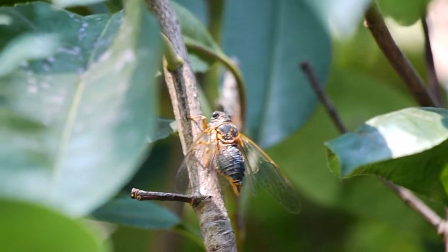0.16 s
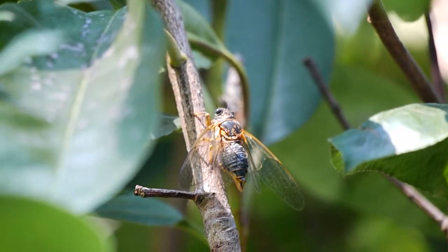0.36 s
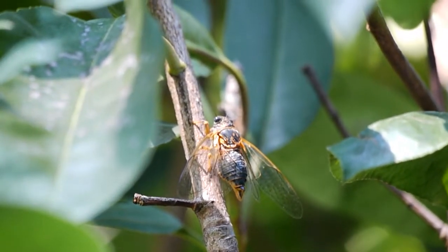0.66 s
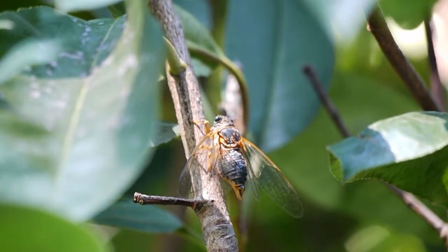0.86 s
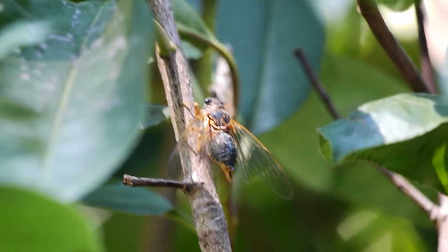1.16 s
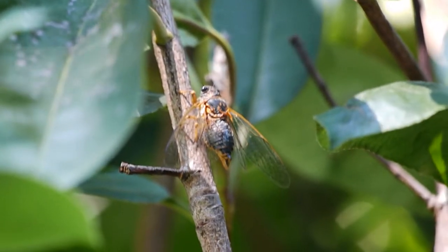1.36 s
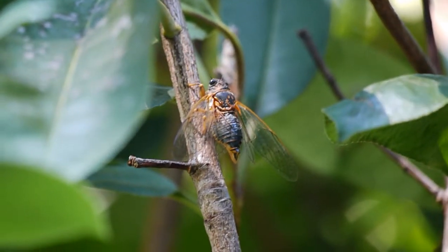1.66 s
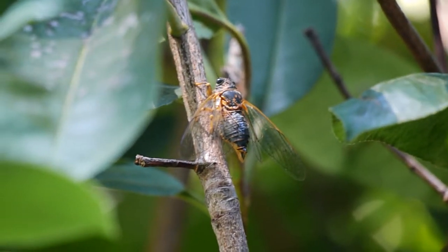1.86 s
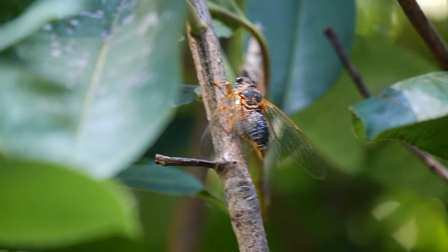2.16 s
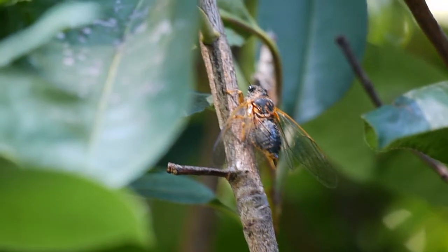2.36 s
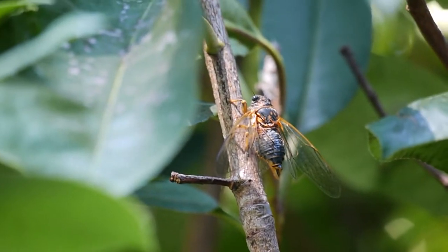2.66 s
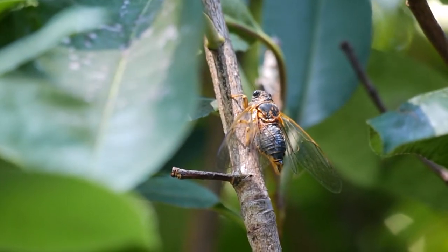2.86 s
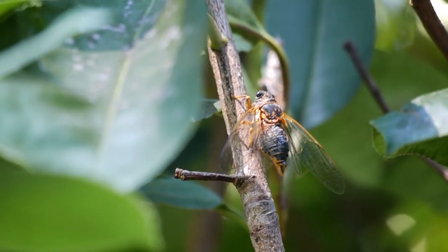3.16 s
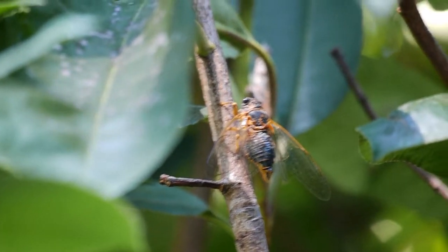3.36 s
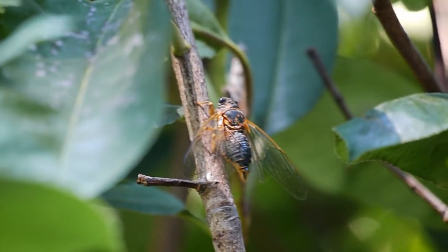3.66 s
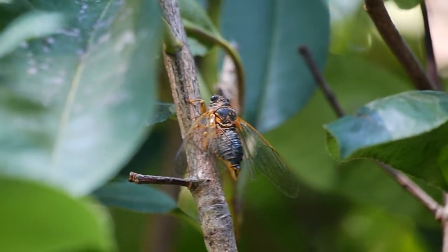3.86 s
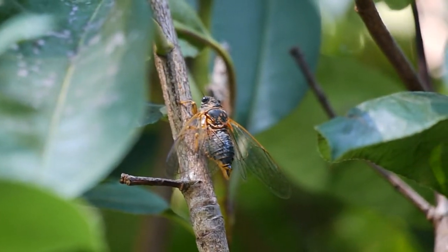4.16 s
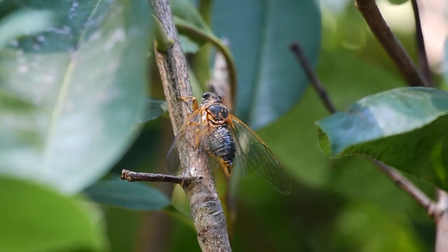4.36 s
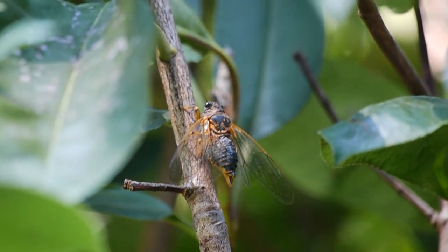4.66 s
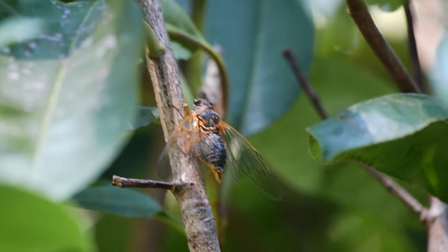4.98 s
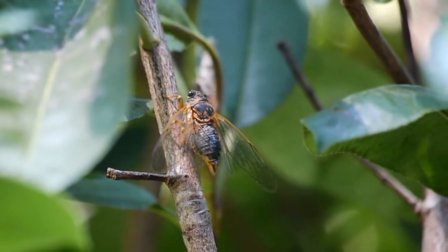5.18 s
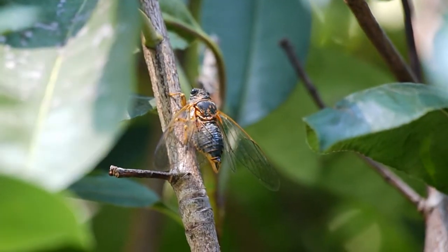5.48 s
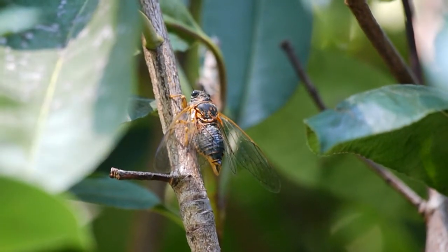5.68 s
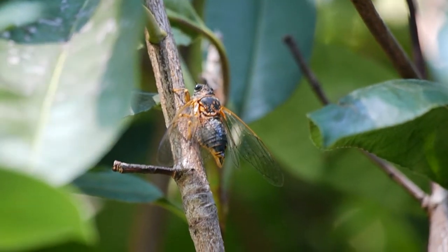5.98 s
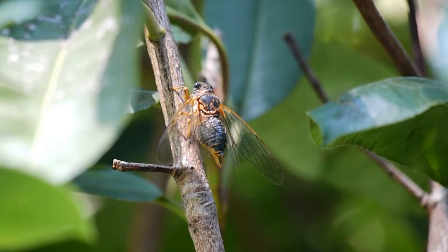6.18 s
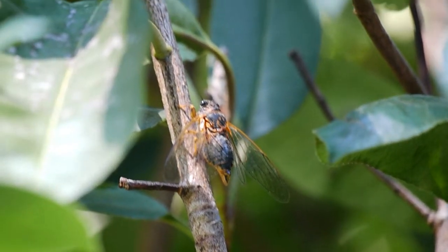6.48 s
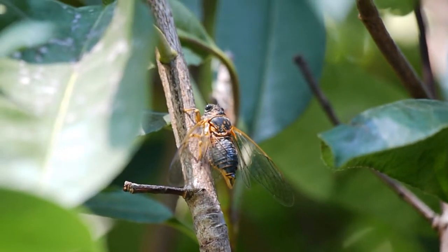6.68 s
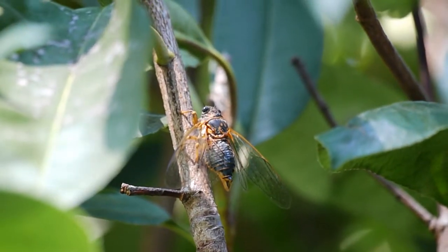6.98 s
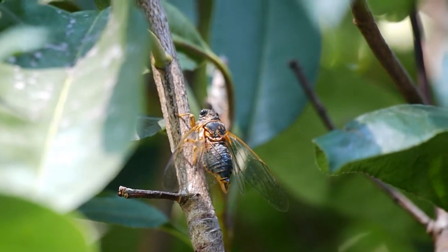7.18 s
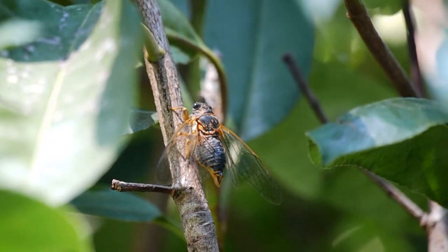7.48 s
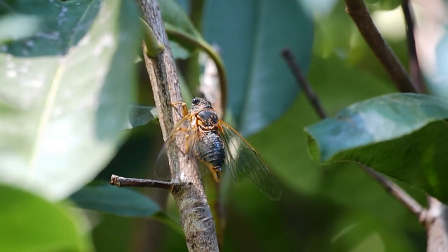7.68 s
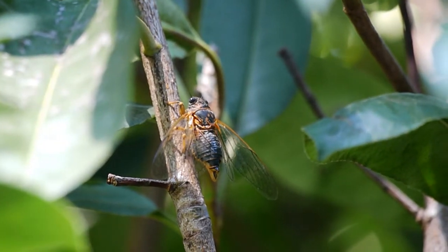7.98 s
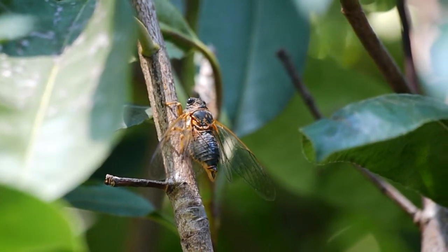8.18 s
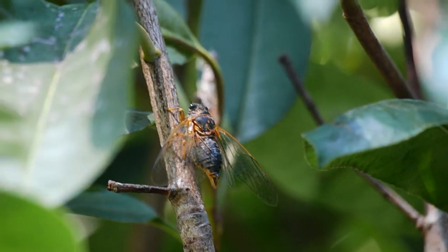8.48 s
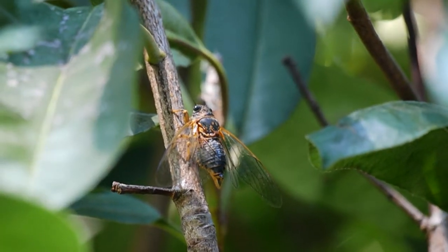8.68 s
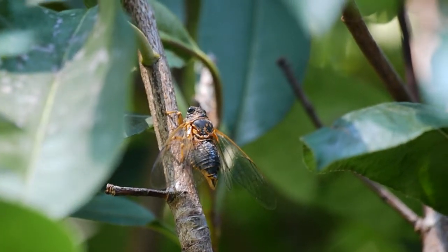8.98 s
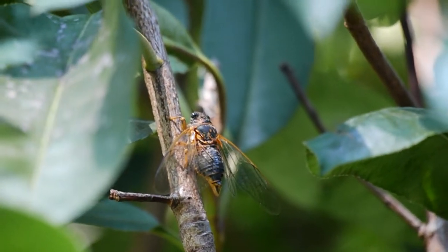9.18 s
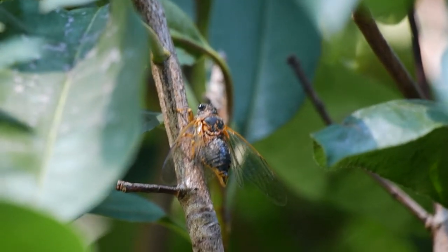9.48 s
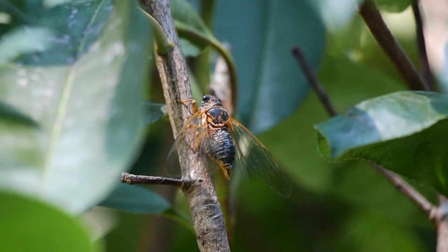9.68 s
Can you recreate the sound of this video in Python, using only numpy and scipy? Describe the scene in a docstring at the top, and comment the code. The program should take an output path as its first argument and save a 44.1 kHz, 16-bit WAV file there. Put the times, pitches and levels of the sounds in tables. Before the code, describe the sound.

One cicada on a twig sings an unbroken, piercing high buzz at close range, slowly softening and roughening over a faint distant town rumble.

```python
"""Leafy shrubs, a distant town: a cicada on a twig sings one unbroken buzz, close to two microphones.
Its two tymbals buckle in turn, rib after rib; the clicks ring its membranes and hollow abdomen.
The tone shifts with its posture; it slowly softens and roughens. Leaves echo the bare clicks.
Behind are shaped noise for the town and vehicles, narrow noise bands for far insects, a fan's
wavering sine tones and one decaying noise tick from a twig."""
import sys
import numpy as np
from scipy import signal
from scipy.fft import rfft, irfft, next_fast_len
from scipy.io import wavfile
from scipy.ndimage import map_coordinates

SR = 44100
rng = np.random.default_rng(int(sys.argv[2]) if len(sys.argv) > 2 else 0)


def to_wav(s):
    """Save 16-bit WAV."""
    ch = np.atleast_2d(s).T  # columns
    pcm = np.round(np.clip(ch, -1, 1) * 32767)  # PCM
    wavfile.write(sys.argv[1], SR, pcm.astype(np.int16))


N = 433944
TIME_S = np.arange(N) / SR

# The cicada's posture, which picks or blends the level columns of BODY_MODES: start_s, posture (0-2)
POSTURE_PATH = [(0, 0), (1.6, 0), (2.15, .4), (2.3, 1.4), (3.8, .85), (4.7, 1.3), (9.84, 2)]
# The ribs of a tymbal, buckling one after another in each contraction: delay_ms, click_db (relative)
TYMBAL_RIBS = [(0, 5), (1.151, -9), (1.998, -2.5), (2.751, -5), (3.599, 8), (5.3, 0.5)]
# Resonances of membranes and abdomen, levels relative to each other:
# pitch_hz, posture_0_db, posture_1_db, posture_2_db
BODY_MODES = [(7648, -54, -55, -56), (8225, -49, -51, -51), (8514, -42, -45, -47), (8947, -47, -44, -42),
              (9091, -41, -37, -37), (9235, -39, -40, -39), (9524, -37, -36, -43), (9668, -41, -48, -42),
              (9957, -38, -32, -34), (10101, -40, -35, -36), (10245, -27, -29, -31), (10390, -31, -37, -36),
              (10534, -43, -43, -40), (10678, -38, -35, -36), (11111, -40, -39, -42),
              (11255, -40, -39, -39), (11833, -50, -48, -43), (12410, -56, -51, -54),
              (12698, -54, -59, -57)]
# Colour of a bare click: pitch_hz, level_db (relative)
CLICK_COLOUR = [(3000, -50), (6700, -28), (7500, -13), (8400, -9), (9200, -2), (9750, -5), (10290, 3),
                (10580, -14), (10800, -4), (11300, -3), (11580, -14), (12700, -15), (13400, -22),
                (14600, -30)]
# Noise colours of the town wash, thin hiss and passing vehicles: pitch_hz, level_db (relative, per Hz)
WASH_COLOUR = [(12, -30), (22, -17), (45, -0.5), (85, -4.5), (125, -1.5), (300, -3.5), (560, -5),
               (880, -3.5), (1250, -6), (1700, -11), (2400, -17), (3300, -20.5), (4600, -23.5),
               (9000, -26.5)]
HISS_COLOUR = [(2500, -22), (5000, -21.5), (9000, 30), (15000, -11)]
TRAFFIC_COLOUR = [(70, -23), (150, -4.5), (280, 0), (420, -5), (700, -20), (1500, -50)]
# Motor and blade tones of the fan unit: pitch_hz, level_db (rms, before the fan's trim and flutter)
FAN_TONES = [(59.2, -53), (114.4, -55.5), (232.8, -54), (294.7, -58.5), (411.8, -55.5), (471.0, -58),
             (530.3, -59), (588.1, -61), (1162.8, -60.5), (1999.9, -66.5)]
# Small twig ticks: start_s, onset_db (rms of the noise as the decay begins)
TWIG_TICKS = [(.768, -36)]
# Distant insect bands: pitch_hz, width_hz (of each resonator), level_db (rms, before wavering)
INSECT_BANDS = [(2780, 230, -62), (5400, 95, -66), (6340, 110, -66.5)]
# Moments when the cicada fidgets and its buzz rasps: peak_s, strength (0-1)
RASPS = [(2.26, 0.9), (4.18, .35), (5.88, .3), (9.35, 0.2)]
# Distant vehicles passing: nearest_s, level_db, half_length_s
VEHICLE_PASSES = [(2.4, -50, .3), (3.9, -45.5, .25), (6.3, -44, 0.73), (7.7, -45.5, 1), (9.0, -45.5, 0.38)]

# The muscles tire: contractions per second when fresh and settled, time constant of settling (s)
FRESH_HZ, SETTLED_HZ, SETTLE_S = 144.85, 144.08, 2.4
# Song level at first (dB rms) and its fade
SONG_DB, FADE_DB_PER_S = -22.5, 0.3275
# Click timing scatter at first (microseconds) and its growth
SCATTER_US, SCATTER_US_PER_S = 10.2, 0.31
# Bare clicks relative to the ringing body at first (dB), and their growth
BARE_DB, BARE_DB_PER_S = -9.5, 0.45
# Half-length of a fidget (s); what one of strength 1 adds to scatter (microseconds) and bare clicks (dB)
FIDGET_S, FIDGET_US, FIDGET_DB = 0.063, 9, 7
# The throb deepens, then evens out: greatest depth (0-1), its time (s), half-length (s)
THROB_DEPTH, THROB_AT_S, THROB_S = 0.58, 2.8, 5.6
# Upper edge of all the sound (Hz)
TOP_HZ = 15150


def amp(db):
    """Decibels to gain."""
    return 10 ** (np.asarray(db) / 20)


def unit(x):
    """Scaled to rms 1."""
    return x / np.sqrt(np.mean(x ** 2) + 1e-20)


def along(points, hz):
    """Read a curve of (Hz, value) points on a log frequency axis."""
    point_hz, values = np.transpose(points)
    return np.interp(np.log(hz + 1), np.log(point_hz + 1), values)


def wobble(rate):
    """A smooth random curve with rate knots a second."""
    knots = rng.standard_normal(int(N * rate / SR) + 4)
    return map_coordinates(knots, [np.arange(N) * rate / SR])


def hump(at_s, half_s):
    """A smooth bell that peaks at 1, and falls to 1/e at half_s either side."""
    return np.exp(-((TIME_S - at_s) / half_s) ** 2)


def filtered(x, response):
    """Shape x by a response given as a function of frequency."""
    size = next_fast_len(N + 8192)
    spectrum = rfft(x, size) * response(np.fft.rfftfreq(size, 1 / SR))
    return irfft(spectrum, size)[..., :N]


def noise(colour):
    """Coloured noise of rms 1."""
    return unit(filtered(rng.standard_normal(N), lambda hz: amp(along(colour, hz))))


def resonate(x, hz, width_hz):
    """A steep-sided resonance: two equal resonators in a row."""
    b, a = signal.iirpeak(hz, hz / width_hz, SR)
    once = signal.lfilter(b, a, x)
    return signal.lfilter(b, a, once)


def pulses(at, sizes, order=8):
    """Impulses between samples: each is a short windowed sinc around its exact position."""
    index = np.floor(at).astype(int)[:, None] + np.arange(1 - order, order + 1)
    offset = index - at[:, None]
    shape = np.sinc(offset) * np.cos(np.pi * offset / (2 * order)) ** 2
    weights = sizes[:, None] * shape * (index >= 0)
    # everything past the end lands in one spare sample, which is dropped
    return np.bincount(np.clip(index, 0, N).ravel(), weights.ravel(), N + 1)[:N]


def contractions(waver=0.000702):
    """The running count of tymbal contractions: the rate sags, settles and wavers slightly."""
    rate_hz = SETTLED_HZ + (FRESH_HZ - SETTLED_HZ) * np.exp(-TIME_S / SETTLE_S)
    return np.cumsum(rate_hz * (1 + waver * wobble(16))) / SR


def rib_clicks(cycles, scatter_us, looseness=1.85, lag_us=7, size_db=1.0, slip_us=3):
    """Each rib's firm train, to ring the body; and the bare clicks of all ribs, more loosely timed."""
    starts = np.interp(np.arange(int(cycles[-1])), cycles, np.arange(N))
    scatter = scatter_us[starts.astype(int)]
    # one tymbal fires slightly behind the beat, adding weak lines halfway between the harmonics
    lag = lag_us * (np.arange(len(starts)) % 2)
    slip = lag + slip_us * rng.standard_normal(len(starts))
    firm, loose = [], []
    for delay_ms, click_db in TYMBAL_RIBS:
        jitter, strength, crumple = rng.standard_normal((3, len(starts)))
        at = starts + SR * (delay_ms / 1e3 + (slip + scatter * jitter) / 1e6)
        sizes = amp(click_db + size_db * strength)
        loose_at = at + SR * looseness * scatter * crumple / 1e6
        firm.append(pulses(at, sizes))
        loose.append(pulses(loose_at, sizes))
    return firm, sum(loose)


def body(ribs, width_hz=130, count=3):
    """The first three ribs each ring their own share of the resonances; posture sets the balance."""
    posture = np.interp(TIME_S, *np.transpose(POSTURE_PATH))
    ring, power = np.zeros(N), np.zeros(N)
    for k, (hz, *posture_db) in enumerate(BODY_MODES):
        gain = np.interp(posture, np.arange(len(posture_db)), amp(posture_db))
        ring += gain * unit(resonate(ribs[k % count], hz, width_hz))
        power += gain ** 2
    return ring / np.sqrt(power)  # posture changes tone, not the summed power of the gains


def leaves(x, t60, echo_db):
    """Foliage scatters sound into short diffuse echoes (a decaying noise tail) between the clicks."""
    tail_s = np.arange(SR // 10) / SR
    tail = rng.standard_normal(len(tail_s)) * amp(-60 * tail_s / t60)
    echoes = unit(signal.oaconvolve(x, tail)[:N])
    return unit(unit(x) + amp(echo_db) * echoes)


def cicada():
    """Ringing body, throbbing once a contraction, plus bare clicks; softer and rougher as it tires."""
    fidget = sum(strength * hump(s, FIDGET_S) for s, strength in RASPS)
    scatter_us = SCATTER_US + SCATTER_US_PER_S * TIME_S + FIDGET_US * fidget
    bare_gain = amp(BARE_DB + BARE_DB_PER_S * TIME_S + FIDGET_DB * fidget)
    cycles = contractions()
    ribs, bare = rib_clicks(cycles, scatter_us)
    coloured = filtered(bare, lambda hz: amp(along(CLICK_COLOUR, hz)))
    clicks = leaves(coloured, t60=0.052, echo_db=4)
    # the body radiates best while the ribs buckle, and is damped as they spring back
    depth = THROB_DEPTH * hump(THROB_AT_S, THROB_S)
    crest = 0.28  # loudest point, as a fraction of a contraction
    throb = (1 + depth * np.cos(2 * np.pi * (cycles - crest))) / np.sqrt(1 + depth ** 2)
    ringing = unit(throb * body(ribs))
    song = (ringing + bare_gain * clicks) / np.sqrt(1 + bare_gain ** 2)
    return amp(SONG_DB - FADE_DB_PER_S * TIME_S) * unit(song)


def town():
    """Shaped noise: a steady far wash, the low murmur of passing vehicles and a thin hiss."""
    wash = amp(-38.5 + 0.22 * wobble(2.99)) * noise(WASH_COLOUR)
    # powers of the passes add to a constant floor of traffic
    passing = sum((amp(db) * hump(s, half_s)) ** 2 for s, db, half_s in VEHICLE_PASSES)
    traffic = np.sqrt(passing + amp(-53) ** 2) * noise(TRAFFIC_COLOUR)
    return wash + traffic + amp(-55.0) * noise(HISS_COLOUR)


def far_insects(waver_db=2.5):
    """Thin bands of resonated noise, each wavering in level."""
    total = np.zeros(N)
    for hz, width_hz, db in INSECT_BANDS:
        band = unit(resonate(rng.standard_normal(N), hz, width_hz))
        total += amp(db + waver_db * wobble(4)) * band
    return total


def fan(drift_hz=1.593, flutter_db=1.0, trim_db=0.54):
    """Motor and blade sine tones, each slightly unsteady in pitch and level."""
    total = np.zeros(N)
    for hz, db in FAN_TONES:
        level = amp(db + trim_db + flutter_db * wobble(3.7))
        turns = hz * TIME_S + drift_hz * np.cumsum(wobble(5)) / SR
        total += level * np.sqrt(2) * np.sin(2 * np.pi * turns)
    return total


def twig(hz=3400, width_hz=1100, t60=0.019):
    """A faint dry tick: resonated noise that starts at once and dies away."""
    envelope = sum(amp(db - 60 * np.abs(TIME_S - s) / t60) * (TIME_S >= s) for s, db in TWIG_TICKS)
    return envelope * unit(resonate(rng.standard_normal(N), hz, width_hz))


def scene():
    """All sources reach the two closely spaced microphones alike."""
    mono = cicada() + town() + far_insects() + fan() + twig()
    return np.array([mono, mono])


def record(dry, left_hz=180, right_hz=28, alike_hz=1150):
    """The left microphone rolls off the bass earlier than the right; in the treble the two are alike."""
    def ports(hz):
        """Left and right responses, differing mostly below alike_hz."""
        ratio = (1j * hz + right_hz) / (1j * hz + left_hz)
        side = (ratio - 1) / (ratio + 1) / (1 + (hz / alike_hz) ** 4)
        return np.array([1 + side, 1 - side])
    return filtered(dry, lambda hz: ports(hz) * (hz < TOP_HZ))


dry = scene()
out = record(dry)
to_wav(out)
```